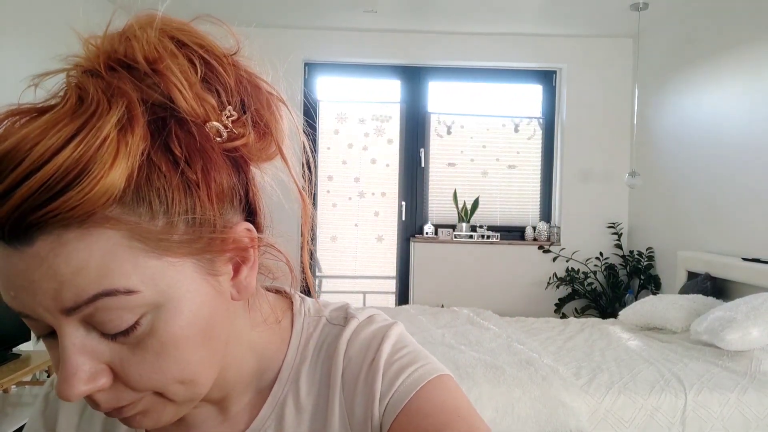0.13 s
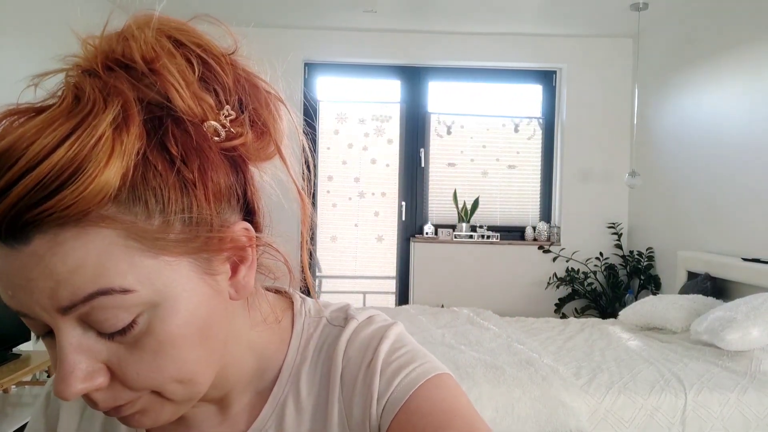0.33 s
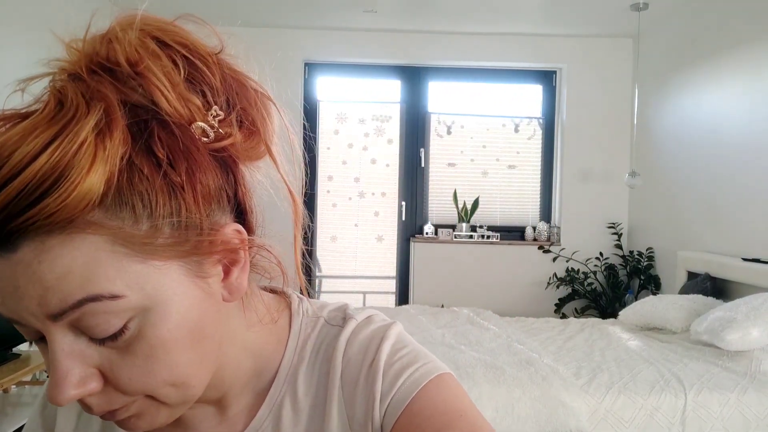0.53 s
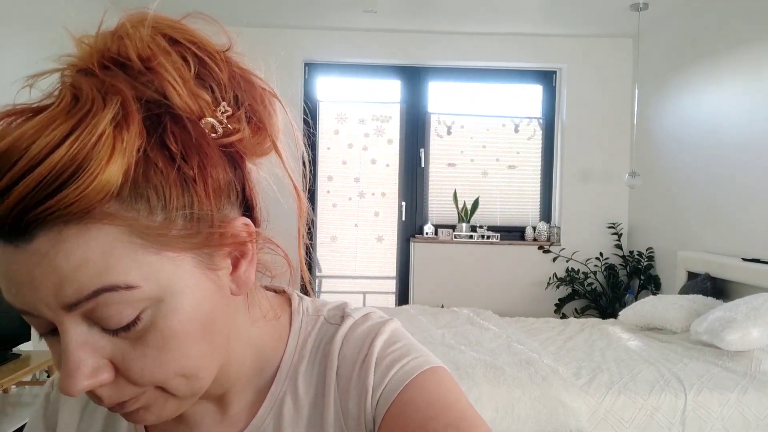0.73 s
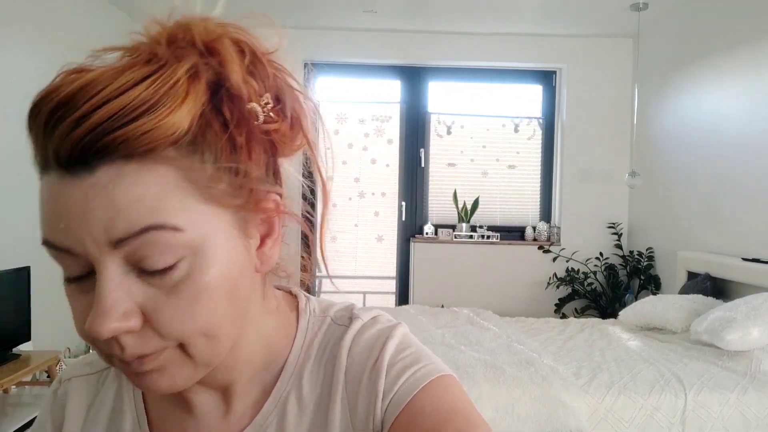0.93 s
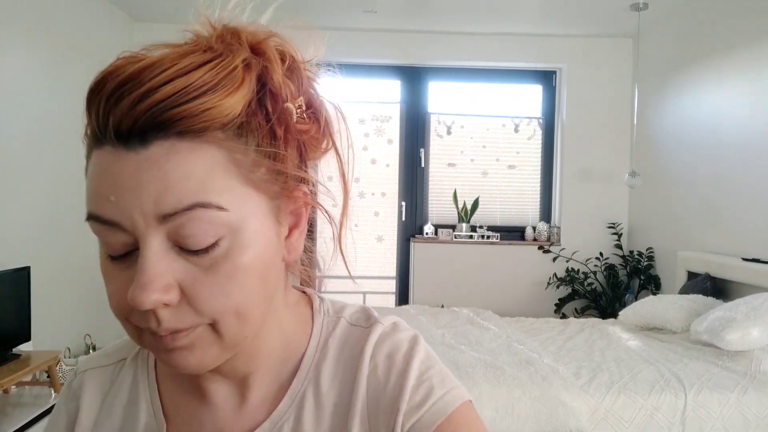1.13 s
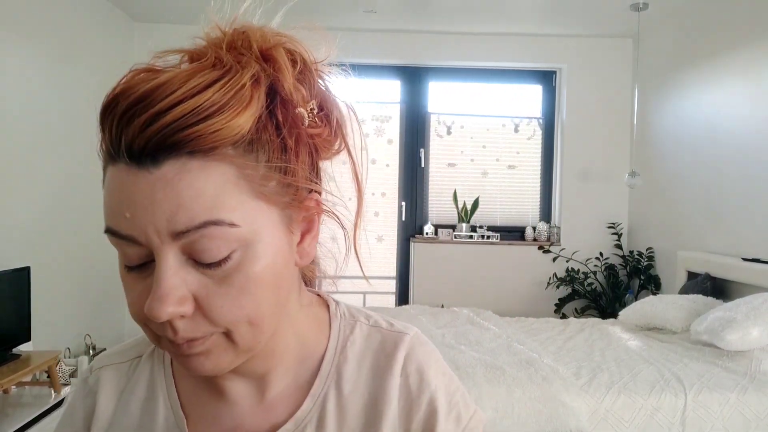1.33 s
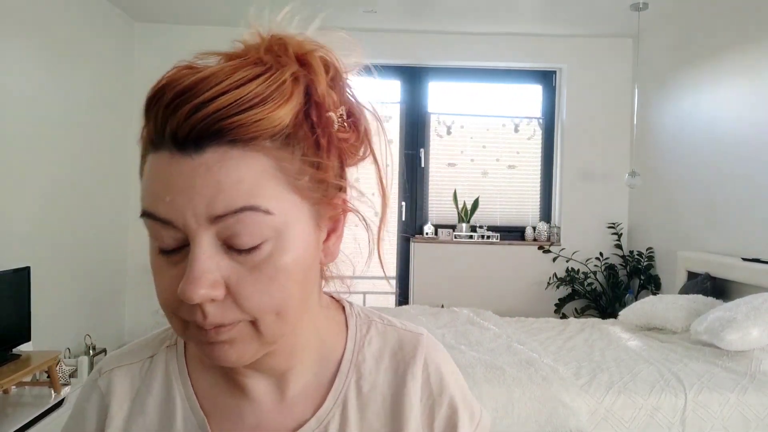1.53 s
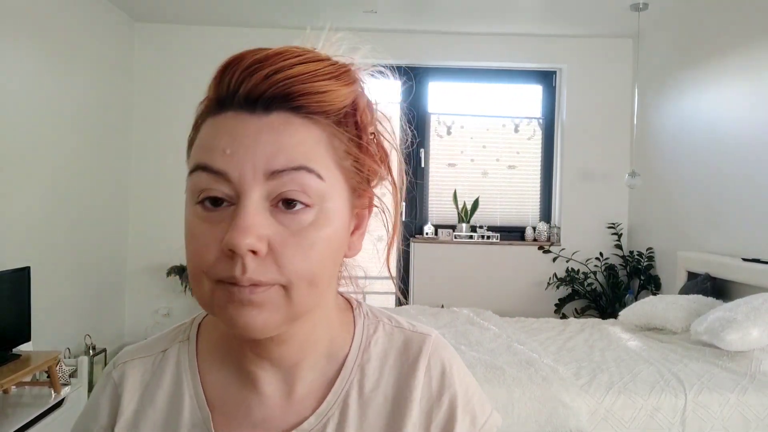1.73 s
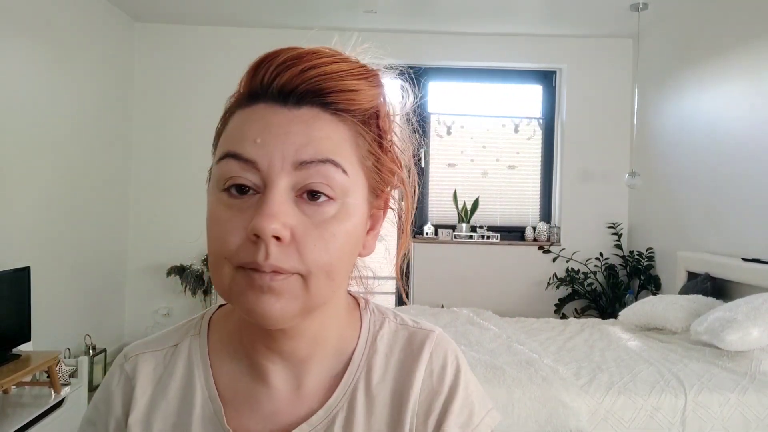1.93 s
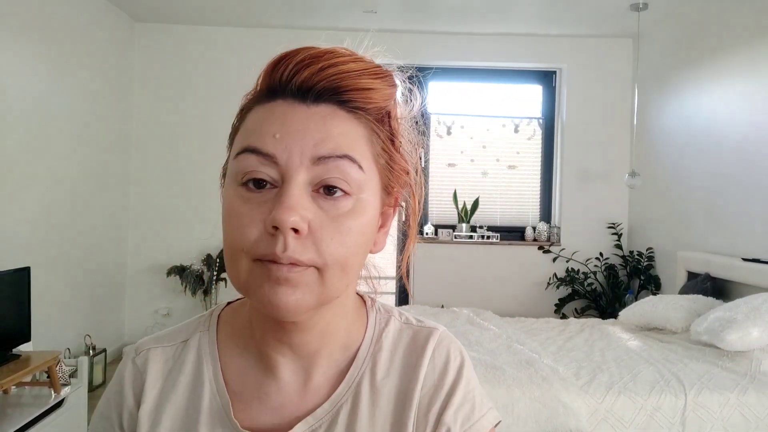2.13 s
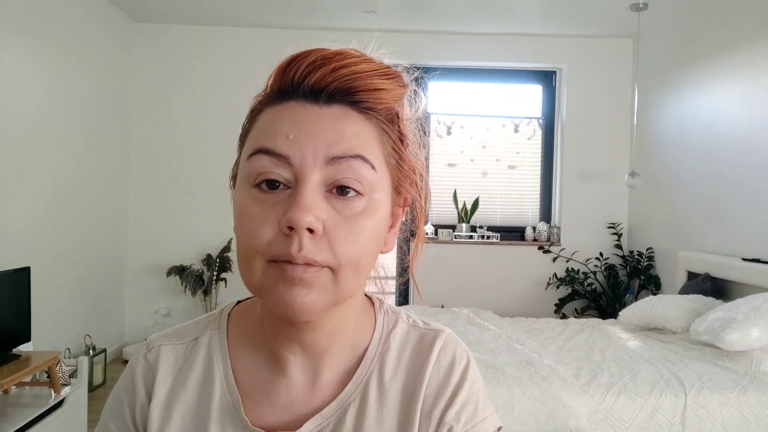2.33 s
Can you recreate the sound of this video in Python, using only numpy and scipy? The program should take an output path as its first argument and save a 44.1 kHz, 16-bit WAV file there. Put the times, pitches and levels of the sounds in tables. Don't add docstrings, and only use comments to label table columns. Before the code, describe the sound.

Small plastic cosmetic containers rummaged in a hollow box, ticking, clacking and knocking in a bare bedroom

```python
import sys
import numpy as np
from scipy import signal
from scipy.fft import rfft, irfft
from scipy.io import wavfile
from scipy.ndimage import uniform_filter1d

SR = 44100
rng = np.random.default_rng(int(sys.argv[2]) if len(sys.argv) > 2 else 0)


def to_wav(sig):
    pcm = np.clip(np.atleast_2d(sig), -1, 1) * 32767
    pcm = np.round(pcm).astype(np.int16)
    wavfile.write(sys.argv[1], SR, pcm.T)


def attenuation_scalar(level_db):
    decades = np.asarray(level_db, float) / 20
    return 10 ** decades


N = 105531

# start in seconds, effort in dB, bright scraping over bumps in dB.
STIR = [(0, -31.5, -0.5), (.12, -41, 6), (.3, -36, -8.5), (.44, -36, -5.5), (0.529, -38, -2),
        (.6, -47.5, -6), (.76, -34, -2.5), (.86, -32, -2), (.95, -38.5, 4), (1.06, -28, -3.5),
        (1.18, -37, 0), (1.25, -38.5, -12), (1.45, -53, -1.5), (1.62, -62.5, 3), (1.72, -40, -2),
        (1.93, -41, -3), (2.1, -31.5, -6.5), (2.39, -45, 1)]
# pitch in Hz, width in Hz, level in dB.
BOX_MODES = [(185.3, 19.3, -3.5), (278.5, 14, -3.5), (350, 38, -2), (452, 40, -0.5), (727, 170, -1.5),
             (845, 45, -6.5), (1277, 63, -8.5), (1530, 125, -8)]
# frequency in Hz, density in dB per Hz.
SCRAPE_SPECTRUM = [(90, -8), (700, -6), (2700, -7), (4200, -10), (6900, -6), (8700, -16.5), (9600, -38),
                   (15500, -38.5)]
# start in seconds, peak in dB, pitch in Hz.
KNOCKS = [(0.012, -29, 400), (0.076, -29, 340), (0.142, -23, 456), (0.144, -22.5, 840), (0.175, -19, 350),
          (0.177, -17, 845), (0.207, -23, 340), (0.275, -26.5, 292), (0.375, -28.5, 345), (0.39, -27, 300),
          (0.392, -22, 720), (0.467, -26, 725), (0.517, -23, 209), (0.567, -28, 850), (0.625, -24.5, 820),
          (0.673, -24, 347), (0.702, -26.5, 730), (0.745, -42, 265), (0.774, -27, 720), (0.793, -11, 740),
          (0.798, -12.5, 1020), (0.804, -15, 747), (0.837, -19.5, 419), (0.855, -16, 770), (0.94, -21, 825),
          (0.964, -18, 507), (0.972, -19, 248), (0.974, -10, 800), (0.984, -21.5, 900), (0.998, -16.5, 730),
          (1.06, -26, 350), (1.077, -12, 800), (1.105, -17.5, 740), (1.132, -23.5, 448), (1.146, -15, 452),
          (1.159, -17.5, 470), (1.164, -23, 191), (1.17, -12, 796), (1.181, -19.5, 824), (1.239, -17, 458),
          (1.251, -22.5, 452), (1.606, -39, 409), (1.65, -30.5, 433), (1.668, -24, 350), (1.685, -26, 467),
          (1.721, -33, 452), (1.727, -20.5, 452), (1.768, -17, 435), (1.808, -31.5, 144), (1.825, -30, 405),
          (1.889, -28.5, 373), (1.955, -31, 149), (1.963, -25, 458), (1.99, -22.5, 280), (2.019, -5, 428),
          (2.026, -16, 433), (2.055, -13.5, 473), (2.082, -19, 425), (2.175, -14.5, 433), (2.196, -19, 435)]
# frequency in Hz, gain in dB.
KNOCK_BASS_ROLLOFF = [(60, -26), (160, 0.5)]
# start in seconds, peak in dB, pitch in Hz, ring (t60) in cycles.
CLACKS = [(0.0508, -31, 1270, 40), (0.0673, -25.5, 1410, 49), (0.1412, -19, 1400, 51),
          (0.177, -15, 1530, 22), (0.2453, -25, 1530, 31), (0.2952, -20.5, 1290, 10),
          (0.364, -22, 1530, 57), (0.389, -18, 1840, 25), (0.4323, -34, 1160, 30), (0.463, -11.5, 2460, 16),
          (0.4676, -21, 1576, 63), (0.508, -19, 1407, 32), (0.5214, -22.5, 1530, 40),
          (0.625, -31, 1850, 28), (0.6472, -26, 1550, 63), (0.6715, -10.5, 2440, 38),
          (0.678, -21.5, 1480, 40), (0.7462, -49, 1390, 35), (0.7609, -11.5, 2830, 29),
          (0.7914, -7, 1387, 23), (0.837, -16.5, 1610, 36), (0.8386, -12, 2900, 30),
          (0.9005, -28, 1620, 30), (0.9391, -20.5, 1500, 10), (0.9735, -16, 1270, 49),
          (0.9847, -13, 1610, 26), (1.043, -19.5, 1590, 29), (1.046, -20.5, 947, 40),
          (1.057, -17, 1130, 28), (1.066, -22, 1190, 34), (1.1071, -27.5, 1600, 21),
          (1.1177, -8.5, 1670, 23), (1.127, -18.5, 1640, 44), (1.1859, -17.5, 2400, 26),
          (1.2228, -21, 1580, 23), (1.2395, -10, 1660, 14), (1.2401, -17, 985, 13), (1.607, -48, 1100, 34),
          (1.6701, -23.5, 2570, 24), (1.726, -46, 1280, 30), (1.7672, -41, 1140, 32),
          (1.8582, -32.5, 1100, 27), (1.9897, -26, 1760, 32), (1.989, -26, 940, 30),
          (2.0648, -30, 1350, 25), (2.0799, -18, 1413, 34), (2.165, -26, 1560, 33),
          (2.189, -22.5, 1530, 51), (2.306, -30.5, 1360, 27)]
# start in
# seconds, peak in dB, pitch in Hz, chatter in ms.
TICKS = [(0.1416, -14, 6800, 2.9), (0.1748, -17, 8200, 3.9), (0.241, -29, 7540, 3.2),
         (0.36, -30.5, 7400, 5.5), (0.4642, -12.5, 6700, 2.9), (0.4687, -11.5, 7900, 2.5),
         (0.505, -21, 8360, 3.6), (0.5194, -22, 6660, 4.3), (0.435, -36, 7000, 1.9),
         (0.596, -30, 7000, 2.1), (0.616, -28, 6600, 9.6), (0.6458, -29, 6960, 2.5),
         (0.7327, -36, 7000, 2.5), (0.667, -23, 6500, 2.6), (0.6713, -12, 7860, 3.85),
         (0.7466, -21, 7600, 3.9), (0.759, -20, 6700, 6.7), (0.784, -16, 7000, 3.2),
         (0.7884, -9.5, 7800, 1.7), (0.792, -4, 6630, 2.8), (0.8985, -17, 7200, 4.1),
         (0.9647, -14.5, 7600, 10), (0.9733, -8.5, 5500, 3.4), (0.9832, -11, 7650, 1.9),
         (1.026, -20.5, 6640, 2), (1.0334, -14, 7400, 5.1), (1.1163, -22.5, 7000, 2.6),
         (1.143, -27, 7040, 2.7), (1.168, -26.5, 7100, 3.1), (1.185, -26, 7400, 3.1),
         (1.2373, -7.5, 7630, 2.1), (1.394, -28, 6600, 1.7), (1.6676, -21, 7400, 1.1),
         (1.911, -28.5, 6000, 1.9), (1.7219, -33, 7100, 2.5), (1.7856, -34, 7000, 2.9),
         (1.9625, -37, 7100, 3), (1.9982, -29, 7500, 2.1), (2.0264, -27, 7030, 1.9), (2.08, -30.5, 6860, 3),
         (2.1242, -33, 7000, 3.5), (2.1887, -4, 5900, 1.8), (2.196, -19, 7600, 3.1),
         (2.2856, -12, 7500, 3.7), (2.3045, -14.5, 6070, 2.5)]
# frequency in Hz, density in dB per Hz.
CAP_SPECTRUM = [(800, -12), (1500, -20), (3000, -7), (4400, -12.5), (6800, -3), (8700, -6.5),
                (10000, -17.5), (16000, -25)]
# frequency in Hz, density in dB per Hz.
FLOOR_SPECTRUM = [(20, 0), (80, -15.5), (200, -3.5), (900, -32), (3500, -33), (7000, -37.5), (9000, -35.5),
                  (15000, -46)]
# frequency in Hz, t60 in seconds.
ROOM_T60 = [(150, 1), (400, 0.44), (1000, 0.47), (2800, 0.48), (7300, 0.62), (14000, 0.22)]
# frequency in Hz, gain in dB.
ROOM_LEVEL = [(150, -8), (600, -1.5), (2000, -4), (7000, -7.5), (14000, -3.5)]
# frequency in Hz, left minus right in dB (before a scaling by 1.44).
PORT_SHADING = [(60, 4.5), (250, 3), (1000, 2), (2500, 0), (5500, -7), (8500, -4.5), (12000, 7)]

# ratio to main pitch, level in dB, share of the main t60.
BOX_PARTS = [(1.0006, 3.5, 1.0), (0.772, -2.0, 0.66), (0.55, -3, 0.4), (1.914, -20.5, 1.0)]
SHELL_PARTS = [(0.998, 2.4, 1.0), (1.184, -18.5, 1.0), (0.6, 3, 0.12), (0.75, -10, 0.36)]

TICK_DB, CLACK_DB, STIR_DB, FLOOR_DB = 3.5, 3.5, -0.5, -49.5
BOX_RING_CYCLES = 24.5
KNOCK_LAG_S = 0.002057
LEFT_LEAD_S = 0.0001
HIT_ROOM_DB, BOX_ROOM_DB, STIR_ROOM_DB = -0.5, -3, 2


def evened(x):
    return x / np.sqrt(np.mean(x ** 2) + 1e-20)


def peaked(x, db):
    return attenuation_scalar(db) * x / abs(x).max()


def read(points, hz):
    f, value = np.transpose(points)
    return np.interp(np.log(hz + 1), np.log(f + 1), value)


def coloured(x, points):
    n = x.shape[-1]
    return irfft(rfft(x) * attenuation_scalar(read(points, np.fft.rfftfreq(n, 1 / SR))), n)


def add(mix, start_s, sound):
    part = mix[round(start_s * SR):][:len(sound)]
    part += sound[:len(part)]


def mode(hz, t60_s, t):
    return attenuation_scalar(-60 * t / max(t60_s, 0.002)) * np.sin(2 * np.pi * hz * t)


def contacts(per_s, spread_db):
    size_db = spread_db * np.minimum(rng.exponential(1, N), 4)
    size = attenuation_scalar(size_db) * rng.standard_normal(N)
    return size * (rng.random(N) < per_s / SR)


def shuffle():
    start_s, effort_db, bright_db = np.transpose(STIR)
    now, t = np.arange(N) / SR, np.arange(4096) / SR
    bumps = np.zeros(N)
    for hz, width_hz, db in BOX_MODES:
        ring = mode(hz, 1.66 / max(width_hz, 25), t)
        bumps += attenuation_scalar(db) * evened(signal.oaconvolve(contacts(450, 0.93), ring)[:N])
    grit = coloured(contacts(3000, 2.67), SCRAPE_SPECTRUM)
    effort = attenuation_scalar(np.interp(now, start_s, effort_db) + STIR_DB)
    bright = attenuation_scalar(np.interp(now, start_s, bright_db))
    return effort * (evened(bumps) + bright * evened(grit))


def struck_body(db, hz, cycles, roughness, contact_s, parts, length):
    t = np.arange(length) / SR
    u = t / contact_s
    force = 1 + roughness * rng.standard_normal(length)
    blow = uniform_filter1d(force, size=7) * u * np.exp(-u)
    body = sum(attenuation_scalar(part_db) * mode(hz * ratio, cycles / hz * share, t) for ratio, part_db, share in parts)
    return peaked(signal.fftconvolve(blow, np.diff(body, prepend=0))[:length], db)


def knocks():
    out = np.zeros(N)
    for start_s, db, hz in KNOCKS:
        sound = struck_body(db, hz, BOX_RING_CYCLES, 1.8, 0.13 / hz, BOX_PARTS, 8192)
        add(out, start_s + KNOCK_LAG_S, sound)
    return coloured(out, KNOCK_BASS_ROLLOFF)


def clacks():
    out = np.zeros(N)
    for start_s, db, hz, cycles in CLACKS:
        add(out, start_s, struck_body(db + CLACK_DB, hz, cycles, 2.25, 0.0001, SHELL_PARTS, 4096))
    return out


def tick(db, hz, chatter_ms):
    t = np.arange(1024) / SR
    u = t / (chatter_ms / 1000)
    z = rfft(rng.standard_normal(len(t)) * u * np.exp(-2.2 * u ** 0.78))
    half_whitened = z / np.sqrt(abs(z) + 1e-9)
    chatter = irfft(half_whitened, len(t)) * np.exp(-u / 4)
    ring = np.convolve(chatter, mode(hz, 0.002, t[:400]))[:len(t)]
    crack = coloured(chatter, CAP_SPECTRUM) * np.minimum(t / 0.00018, 1)
    return peaked(0.9 * evened(ring) + evened(crack), db + TICK_DB)


def ticks():
    out = np.zeros(N)
    for start_s, db, hz, chatter_ms in TICKS:
        add(out, start_s - 0.0005, tick(db, hz, chatter_ms))
    return out


def alike(pair):
    hz = np.fft.rfftfreq(N, 1 / SR)
    same = np.clip(0.51 * np.sinc(hz / 1100) * (hz < 1100), 0, 1)
    a, b = rfft(pair)
    return irfft(np.array([a, same * a + np.sqrt(1 - same ** 2) * b]), N)


def floor_noise():
    noise = alike(coloured(rng.standard_normal((2, N)), FLOOR_SPECTRUM))
    return attenuation_scalar(FLOOR_DB) * evened(noise)


def room(x):
    first, gap = 160, 20
    taps = np.zeros((2, SR))
    grid = np.arange(first, SR - gap, gap)
    at = grid + rng.integers(0, gap, (2, len(grid)))
    np.put_along_axis(taps, at, rng.choice([-1., 1.], at.shape), 1)
    hz, t, z = signal.stft(taps, SR, nperseg=256)
    t60_s = read(ROOM_T60, hz)[:, None]
    tail = signal.istft(z * attenuation_scalar(-60 * t / t60_s) / np.sqrt(t60_s), SR, nperseg=256)[1]
    tail[:, :first] = 0
    tail /= np.linalg.norm(tail[0])
    wet = signal.fftconvolve(x[None], tail, axes=1)[:, :N]
    return alike(coloured(wet, ROOM_LEVEL))


def ports(x):
    hz = np.fft.rfftfreq(N, 1 / SR)
    half = attenuation_scalar(read(PORT_SHADING, hz) * 0.72) * np.exp(1j * np.pi * hz * LEFT_LEAD_S)
    return irfft(rfft(x) * np.array([half, 1 / half]), N)


def scene():
    stirred, knocked = shuffle(), knocks()
    struck = clacks() + ticks()
    to_walls = attenuation_scalar(HIT_ROOM_DB) * struck + attenuation_scalar(BOX_ROOM_DB) * knocked + attenuation_scalar(STIR_ROOM_DB) * stirred
    return ports(struck + knocked + stirred) + room(to_walls) + floor_noise()


def roll_off(x):
    return signal.sosfilt(signal.butter(12, 15800, fs=SR, output="sos"), x)


def record(dry):
    return roll_off(np.clip(dry, -1, 1))


dry = scene()
out = record(dry)
to_wav(out)
```